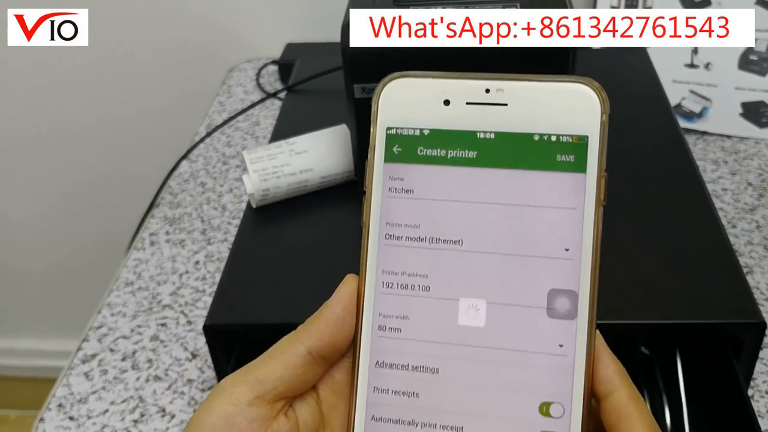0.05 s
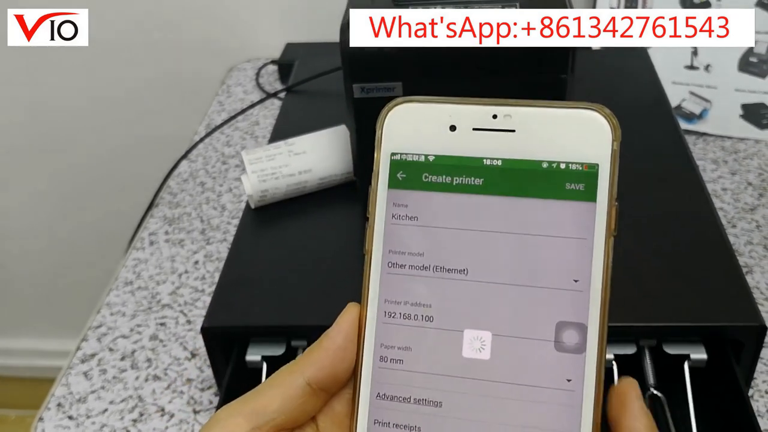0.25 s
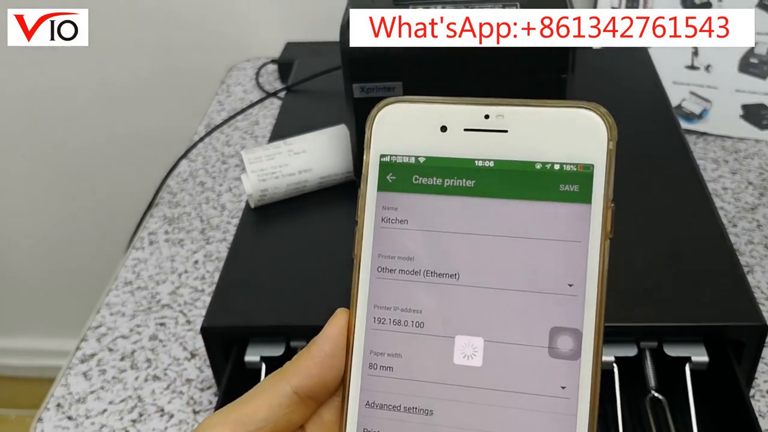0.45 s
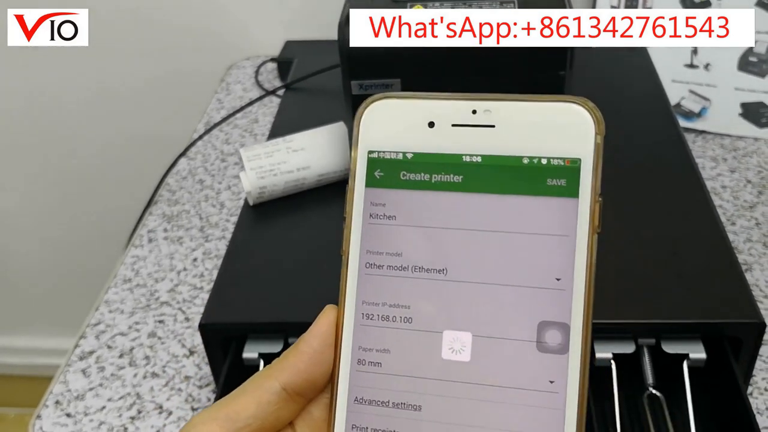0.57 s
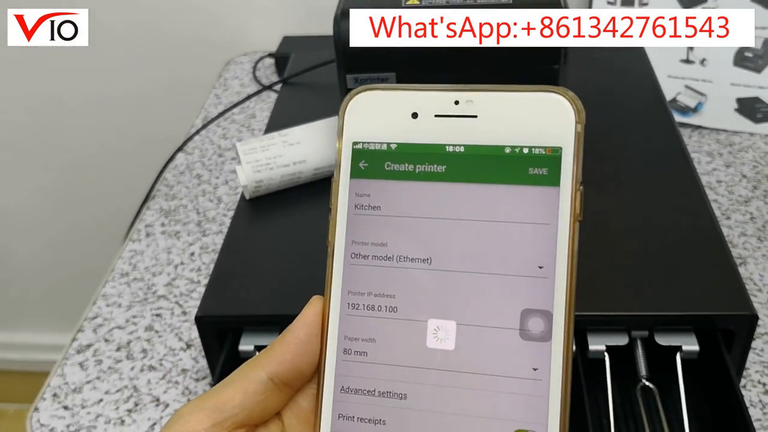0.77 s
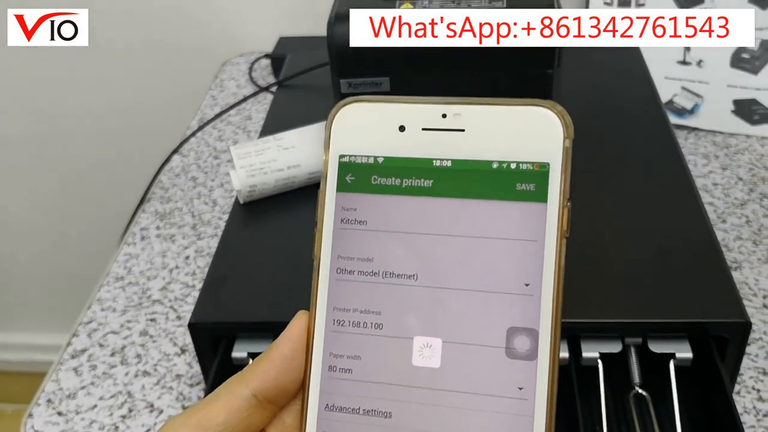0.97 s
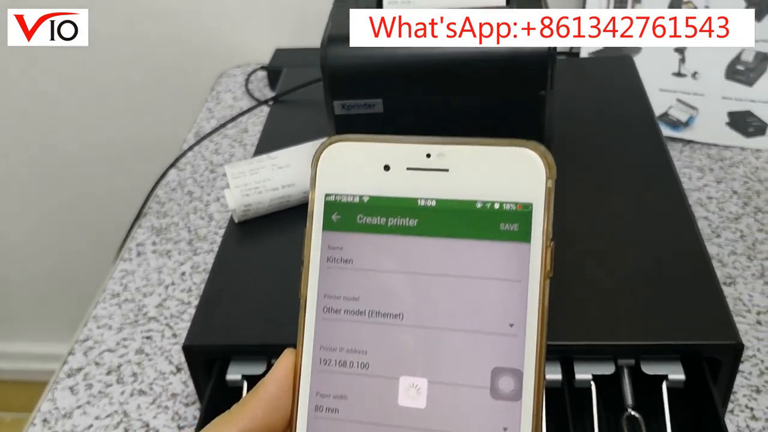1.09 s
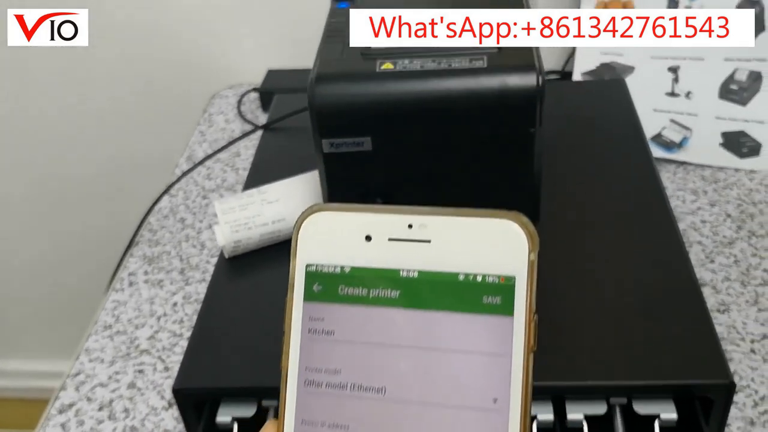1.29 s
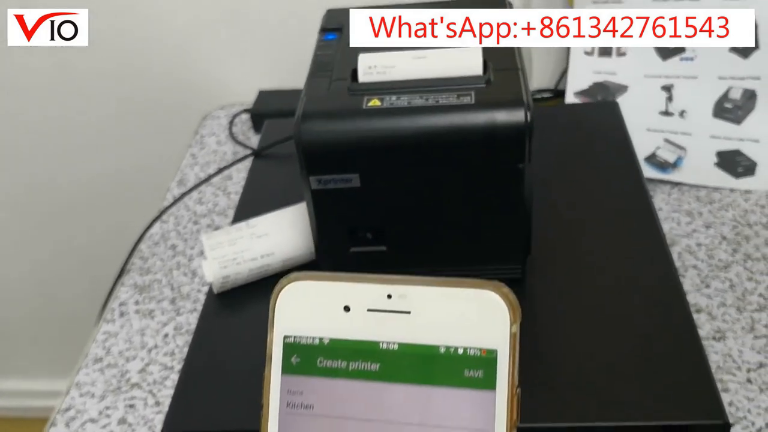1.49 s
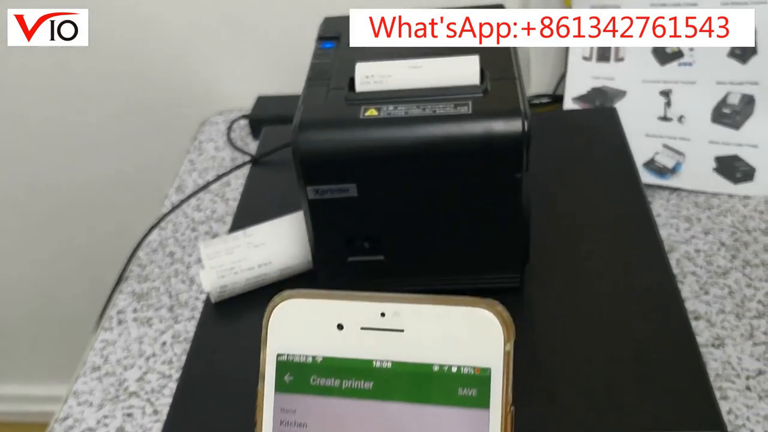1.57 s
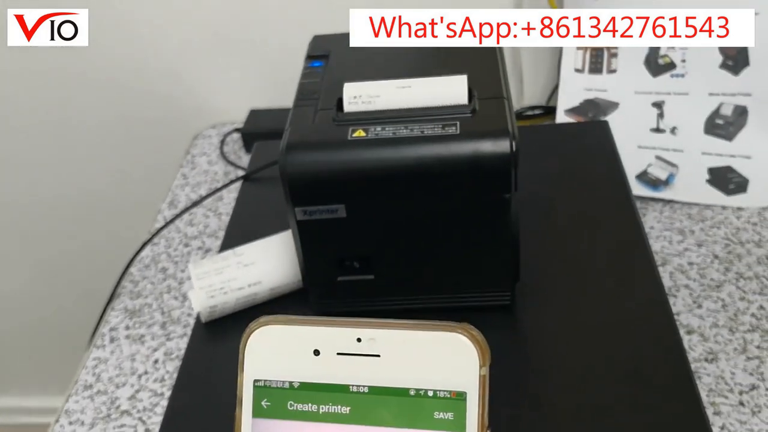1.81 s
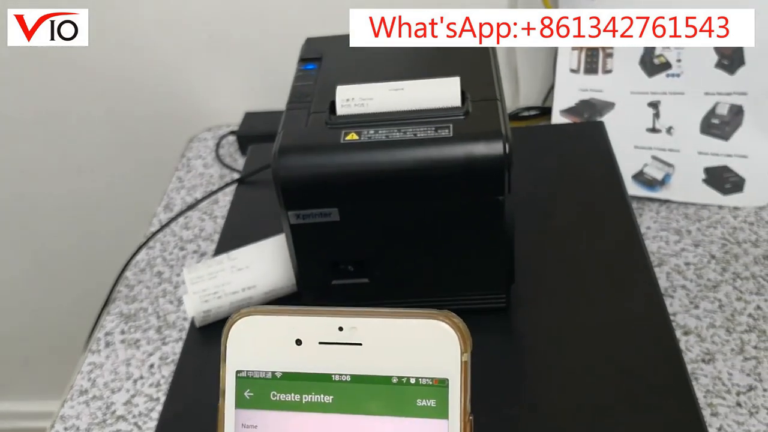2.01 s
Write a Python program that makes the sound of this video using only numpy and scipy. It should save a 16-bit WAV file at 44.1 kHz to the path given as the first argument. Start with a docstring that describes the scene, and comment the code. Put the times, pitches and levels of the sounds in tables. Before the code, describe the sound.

A steel cash drawer unlatches with a loud clattering bang after a brief printer whirr, rolls out hissing and squealing, then knocks against its stop; close stereo microphone in a small room, quiet rumble afterwards.

```python
"""A steel cash drawer under a receipt printer pops open, close to the microphones in a small room.
The printer's mechanism runs down as rubbing noise that dulls; the latch lets go with a bang, and the
tray and its note clips clatter as noise bursts over ringing case modes. The drawer rolls out hissing,
bumping and squealing, then over grit, and knocks on its stop, once and then in a quick cluster.
A low room rumble lies under it all and remains, with a thin whine and one soft low swell near the end."""
import sys
import numpy as np
from scipy import signal
from scipy.fft import rfft, irfft, next_fast_len
from scipy.io import wavfile

SR = 44100
rng = np.random.default_rng(int(sys.argv[2]) if len(sys.argv) > 2 else 0)


def store_pcm(level_fs):
    """Save levels as 16-bit WAV."""
    pcm = np.round(np.clip(level_fs, -1, 1) * 32767).astype(np.int16)
    wavfile.write(sys.argv[1], SR, np.atleast_2d(pcm).T)


N = 90404
T = np.arange(N) / SR
HZ = np.maximum(np.fft.rfftfreq(next_fast_len(N + SR // 4), 1 / SR), 1)

ALIKE_HZ, TREBLE_ALIKE = 413, 0.092  # channels turn unlike around this pitch; shared power far above it
RIPPLE_HZ, RIPPLE_DB = 44.87, 1.5  # spacing of sheet-metal resonances; their spread, reached in the treble
PRINTER_DULL_DB_PER_S = 29  # for each octave above 1 kHz
ROOM_DB, WHINE_HZ = -51.5, 4040  # level of the room rumble; pitch of the whine
SWAY_S, SWAY_DB, SWAY_WIDTH_S, SWAY_HZ = 1.947, -47, 0.07, 53  # a soft low swell near the end
JUDDER_PER_S, JUDDER_DB = 68, -1.56  # uneven contact along the rails
BUMP_WIDTH_S, BUMP_HZ = 0.019, 289
SQUEAL_SAG_OCT_PER_S, SQUEAL_END_S, SQUEAL_RELEASE_S = 0.25, 0.607, 0.011
SQUEAL_SLIPS_PER_S, SQUEAL_JITTER, SQUEAL_FLUTTER_DB = 600, 0.0162, 3.5  # roughness of the squeal
ROOM_T60_S, ROOM_DAMP, ROOM_WET_DB = 0.18, 0.16, -11.5  # decay at 1 kHz; treble shortening; tail level
LATE_T60_S, LATE_DB = 2.7, -20.5  # the faint long part of the room's tail
TOP_HZ = 15200


def amp(db):
    """Decibels to gain."""
    return 10 ** (np.asarray(db) / 20)


def unit(x):
    """Scale to rms 1."""
    return x / np.sqrt(np.mean(x ** 2))


def curve(points):
    """Gain over time from (s, dB) points, held before the first and silent after the last."""
    return amp(np.interp(T, *np.array(points).T, right=-120))


def colour(points):
    """Gain over frequency from (Hz, dB) points, keeping the power of white noise."""
    hz, db = np.array(points).T
    return unit(amp(np.interp(np.log(HZ), np.log(hz), db)))


def shape(x, gain):
    """Filter by a gain for every frequency."""
    return irfft(rfft(x, 2 * len(HZ) - 2) * gain)[..., :N]


def stereo(three, gain):
    """One shared and two separate signals, filtered into a pair that shares its bass."""
    alike = TREBLE_ALIKE + (1 - TREBLE_ALIKE) / (1 + (HZ / ALIKE_HZ) ** 3)
    alike = np.clip(alike, 0, 1)
    shared = shape(three[0], gain * np.sqrt(alike))
    separate = shape(three[1:], gain * np.sqrt(1 - alike))
    return shared + separate


def noise(gain):
    """Coloured stereo noise."""
    return stereo(rng.standard_normal((3, N)), gain)


def octaves(x):
    """Split into overlapping octave bands: (octaves above 1 kHz, band)."""
    place = np.clip(np.log2(HZ / 1000), -4, 4)
    return [(k, shape(x, np.maximum(1 - abs(place - k), 0))) for k in range(-4, 5)]


def fade(t, t60):
    """Exponential decay from time zero, silent before; it falls 60 dB in t60."""
    return (t >= 0) * np.exp(-np.log(1000) * np.maximum(t, 0) / t60)


def wander(rate):
    """Random control of spread near 1 that takes `rate` new values a second."""
    steps = rng.standard_normal(SR // 8)
    return np.interp(T * rate, np.arange(len(steps)), steps)


def metal(points):
    """A colour with crowded random resonances, different at each microphone port."""
    grid = np.arange(0, SR, RIPPLE_HZ)
    peaks = rng.standard_normal((2, SR // 8))[:, :len(grid)]
    ripple = np.array([np.interp(HZ, grid, p) for p in peaks])
    depth_db = RIPPLE_DB * HZ / (HZ + ALIKE_HZ)
    return unit(colour(points) * amp(depth_db * ripple))


def rub(tint, rate, scatter_db):
    """Friction: a dense rain of tiny uneven slips, `rate` a second."""
    hits = rng.random((3, N)) < rate / SR
    slips = hits * rng.standard_normal((3, N))
    strength = amp(scatter_db * np.minimum(rng.exponential(size=(3, N)), 4))
    return stereo(unit(slips * strength), metal(tint))


def clatter(blows, tint, crack_t60, ring_t60, ring_db, damp, attack_s):
    """Each blow gives a short crack and a dense sheet-metal ring; lows build later and stay longer."""
    out = 0
    t = T[:SR]
    for octave, band in octaves(noise(metal(tint))):
        shorten = 2 ** (-damp * octave)
        crack = fade(t, crack_t60 * shorten)
        tail = amp(ring_db) * fade(t, ring_t60 * shorten)
        attack = 1 - np.exp(-t / (attack_s * 2 ** (-octave / 2)))
        power = ((crack + tail) * attack) ** 2
        total = np.zeros(N + SR)
        for s, db, bright in blows:
            i = int(s * SR)
            total[i:i + SR] += amp(db + bright * octave) ** 2 * power
        out = out + band * np.sqrt(total[:N])  # blows add in power
    return out


def ring(blows, modes, spread, detune):
    """Each mode is three close partials, struck in random phase; each port hears its own phase."""
    out, t = np.zeros((2, N + SR)), T[:SR // 2]
    for hz, db, t60 in modes:
        for step in (-1, 0, 1):
            pitch = hz * (1 + detune * (step + rng.uniform(-0.29, 0.4)))
            partial = np.exp(2j * np.pi * pitch * t) * fade(t, t60) * (1 - np.exp(-2 * hz * t))
            push = np.zeros(N + SR, complex)
            for s, strength, bright in blows:
                i = int(s * SR)
                kick = amp(strength + bright * np.log2(hz / 1000)) * np.exp(2j * np.pi * rng.random())
                push[i:i + len(t)] += partial * kick
            port_phase = min(spread * hz / 1000, 2) * rng.standard_normal((2, 1))
            out += amp(db) / np.sqrt(3) * np.imag(push * np.exp(1j * port_phase))
    return out[:, :N]


def printer():
    """The printer's mechanism runs down: rubbing noise that falls unevenly and grows duller."""
    # level while running down: time_s, level_db
    rundown = [(0, -31), (.04, -34.5), (.065, -40), (.09, -34), (.125, -45.5), (.175, -38.5), (.21, -42),
               (.3, -58)]
    # colour of the whirr: pitch_hz, relative level_db (per Hz)
    tint = [(50, -24), (120, -22), (220, -4.5), (290, -3.5), (370, -14.5), (850, -15.5), (1800, -20),
            (3000, -22.5), (4200, -30.5), (7600, -39), (15000, -73)]
    out = 0
    for octave, band in octaves(rub(tint, rate=2100, scatter_db=3.5)):
        out = out + band * amp(-PRINTER_DULL_DB_PER_S * max(octave, 0) * T)
    return curve(rundown) * out


def background():
    """Noise rumble of the room with a thin whine of steady pitch and one low swell."""
    # colour of the rumble: pitch_hz, relative level_db (per Hz)
    tint = [(20, -21), (52, 4.5), (85, -4), (135, 0.5), (300, -11.5), (420, -21), (2000, -17.5),
            (3200, -24.5), (5000, -31), (7600, -32), (10000, -40), (15000, -47.5)]
    # level of the thin electronic whine: time_s, level_db
    whine_level = [(1.2, -86), (1.5, -73.5), (2.1, -74)]
    low = noise(unit(1 / (1 + ((HZ - SWAY_HZ) / 12) ** 2)))  # a narrow hump around SWAY_HZ
    swell = np.exp(-((T - SWAY_S) / SWAY_WIDTH_S) ** 2) * low
    rumble = amp(ROOM_DB) * noise(colour(tint))
    whine = curve(whine_level) * np.sin(2 * np.pi * WHINE_HZ * T)
    return rumble + whine + amp(SWAY_DB) * swell


def latch():
    """The latch lets go; tray and clips clatter and ring the case."""
    # latch bang and the clatter after it: start_s, relative level_db, brightness_db_per_octave
    blows = [(.2005, 1, 2), (.2055, 4, 0), (.2105, 1, -2.5), (.2205, -1.5, -0.5), (.228, -9, -2),
             (.235, -0.5, -0.5), (.2515, 1, -1), (.257, -11.5, 1.5), (.2695, -3.5, 0), (.2785, -7, 0),
             (.291, -7.5, -0.5), (.331, -10.5, -1), (.383, -17.5, 2.5)]
    # colour of the dense ringing: pitch_hz, relative level_db (per Hz)
    tint = [(25, -20), (55, -14.5), (130, -10.5), (280, -5), (470, -17), (760, -13.5), (1900, -7.5),
            (2800, -11.5), (3900, -18), (7800, -21), (11000, -37.5), (15000, -50)]
    # resonances of the case: pitch_hz, relative level_db, decay t60_s
    modes = [(119.4, -8, 0.41), (185.2, -7.5, 0.52), (253, -6.5, 0.6), (298.7, 0, 0.29), (720, -5.5, 0.24),
             (832, 1, 0.12), (938, 0, 0.18), (1264, 0, 0.16), (1584, -0.5, 0.12), (1715, 0.5, 0.26),
             (1846, -7.5, 0.32), (1956, -3.5, 0.25), (2126, -4.5, 0.31), (2594, -8.5, 0.33)]
    cracks = clatter(blows, tint, crack_t60=0.028, ring_t60=0.37, ring_db=-8, damp=0.05, attack_s=0.00076)
    return amp(-16) * cracks + amp(-30) * ring(blows, modes, spread=0.73, detune=0.0047)


def judder():
    """Quick random swings of the contact pressure."""
    return amp(JUDDER_DB * wander(JUDDER_PER_S))


def bumps():
    """Each bump of the rollers makes the tray boom briefly."""
    # bumps of the rollers: centre time_s, level_db
    booms = [(.468, -34), (.53, -34.5), (0.707, -37.5), (.79, -40)]
    out = 0
    for s, db in booms:
        swell = np.exp(-((T - s) / BUMP_WIDTH_S) ** 2)
        out = out + amp(db) * swell * np.sin(2 * np.pi * (BUMP_HZ * T + rng.random()))
    return out


def squeal():
    """Rail resonances swell in turn, rough and slowly sinking, until the contact breaks off."""
    # resonances of the rail: pitch_hz, level_db, centre time_s, swell width_s
    tones = [(1740, -46, 0.44, 0.21), (2600, -50, .575, 0.041), (3550, -39, 0.52, 0.035),
             (4330, -44.5, .505, 0.028), (7100, -38, 0.5, 0.062)]
    out = 0
    for hz, db, s, width in tones:
        sag = 2 ** (-SQUEAL_SAG_OCT_PER_S * (T - s))
        pitch = hz * sag * (1 + SQUEAL_JITTER * wander(SQUEAL_SLIPS_PER_S))
        phase = 2 * np.pi * (np.cumsum(pitch) / SR + rng.random((2, 1)) / 3)
        level = amp(db + SQUEAL_FLUTTER_DB * wander(SQUEAL_SLIPS_PER_S / 2))
        out = out + level * np.exp(-((T - s) / width) ** 2) * np.sin(phase)
    return out * np.clip((SQUEAL_END_S - T) / SQUEAL_RELEASE_S, 0, 1)


def slide():
    """Rollers rumble and bump, the rail hisses and squeals, then runs over grit."""
    # levels along the slide: time_s, level_db
    hiss_level = [(.3, -62), (.39, -41), (.44, -40), (.53, -38), (.598, -34.5), (.608, -49), (.75, -69)]
    grit_level = [(.62, -52.5), (.655, -44), (.663, -40.5), (.675, -31.5), (.715, -32), (.745, -43),
                  (.785, -38), (.81, -36), (.85, -45.5), (.92, -90)]
    roll_level = [(.2, -47), (.36, -39.5), (.47, -36), (.56, -43.5), (.635, -41.5), (.69, -43.5),
                  (.8, -41.5), (.93, -54.5), (1.1, -52.5)]
    # colours of the rubbing and of the ticks: pitch_hz, relative level_db (per Hz)
    hiss_tint = [(600, -6), (1800, -2.5), (2600, -18), (3600, 0.5), (5600, 6), (7200, 5.5), (8600, 0),
                 (10500, -7.5), (12000, -24), (15000, -20)]
    grit_tint = [(600, -18.5), (1800, 7.5), (2300, -7), (2900, 4), (4200, 0.5), (5600, 6.5), (7800, 0.5),
                 (10500, -5), (12200, -26), (14000, -17), (16000, -34)]
    roll_tint = [(25, -17), (55, -9), (110, -18.5), (175, -6), (220, -12.5), (285, -1.5), (390, -6.5),
                 (500, -19), (800, -14), (1450, -28.5), (1760, -7.5), (2100, -15.5), (10000, -39.5)]
    tick_tint = [(500, -18), (2000, 5.5), (7000, 1.5), (15000, -16)]
    # grit under the rollers: start_s, relative level_db, brightness_db_per_octave
    grains = [(.696, 7, 3.5), (.7238, 9, 1.5), (.7392, 7.5, -1), (.772, -0.5, 3.5)]
    hiss = curve(hiss_level) * rub(hiss_tint, rate=3500, scatter_db=-0.5)
    grit = curve(grit_level) * rub(grit_tint, rate=3200, scatter_db=2.5)
    roll = curve(roll_level) * rub(roll_tint, rate=2500, scatter_db=1.5)
    ticks = clatter(grains, tick_tint, crack_t60=0.0045, ring_t60=0.12, ring_db=-16, damp=0.1,
                    attack_s=0.00036)
    return judder() * (hiss + grit + roll + squeal()) + amp(-32) * ticks + bumps()


def stop():
    """The tray knocks against its stop and bounces, cracking and ringing its own modes."""
    # knocks at the end of travel: start_s, relative level_db, brightness_db_per_octave
    knocks = [(.8365, -2, 2), (.9475, -0.5, 0.5), (.9755, -0.5, 1), (.984, -2.5, -2.5)]
    # colour of the dense ringing: pitch_hz, relative level_db (per Hz)
    tint = [(60, -22), (150, -13), (350, -11), (550, -21.5), (1100, -16), (1450, -24), (1900, -20.5),
            (2900, -13), (4300, -25), (7600, -24), (15000, -49.5)]
    # resonances of the tray: pitch_hz, relative level_db, decay t60_s
    modes = [(285.5, -3, 0.29), (376.5, -2.5, 0.27), (1039, -5.5, 0.21), (1136, -1, 0.083),
             (1770, 7.5, 0.06), (1890, 8, 0.087), (2680, 1, 0.15), (3130, -0.5, 0.1), (7750, -4.5, 0.064)]
    cracks = clatter(knocks, tint, crack_t60=0.018, ring_t60=0.27, ring_db=-3.5, damp=0.085, attack_s=0.001)
    return amp(-35.5) * cracks + amp(-41) * ring(knocks, modes, spread=0.52, detune=0.012)


def room(x):
    """Diffuse tail of a small room, a quick part and a faint slow one, shorter in the treble."""
    tail = 0
    for octave, band in octaves(noise(1)):
        age = (T - 0.006) * 2 ** (ROOM_DAMP * octave)  # the tail starts 6 ms after the direct sound
        tail = tail + band * (fade(age, ROOM_T60_S) + amp(LATE_DB) * fade(age, LATE_T60_S))
    wet = signal.fftconvolve(x, unit(tail) / np.sqrt(N), axes=1)[:, :N]
    return x + amp(ROOM_WET_DB) * wet


def scene():
    """Printer, latch, slide and stop in the room, over its background."""
    return room(printer() + latch() + slide() + stop()) + background()


def record(dry):
    """Each port colours its channel; the loudest peaks are rounded and the top is cut."""
    # colour of the two microphone ports: pitch_hz, left gain_db, right gain_db
    ports = [(386, 1.5, 1.5), (477, 3.5, 2), (870, 5.5, 0.5), (1020, 1.5, 1), (6760, -4, -3),
             (7830, -8, 7.5), (8420, -2, -4.5), (9500, 0, -4.5)]
    hz, *sides = np.array(ports).T
    gains = amp([np.interp(np.log(HZ), np.log(hz), db) for db in sides])
    rounded = np.tanh(shape(dry, gains))
    top_cut = signal.ellip(8, 0.2, 70, TOP_HZ, fs=SR, output="sos")
    return signal.sosfilt(top_cut, rounded)


dry = scene()
out = record(dry)
store_pcm(out)
```